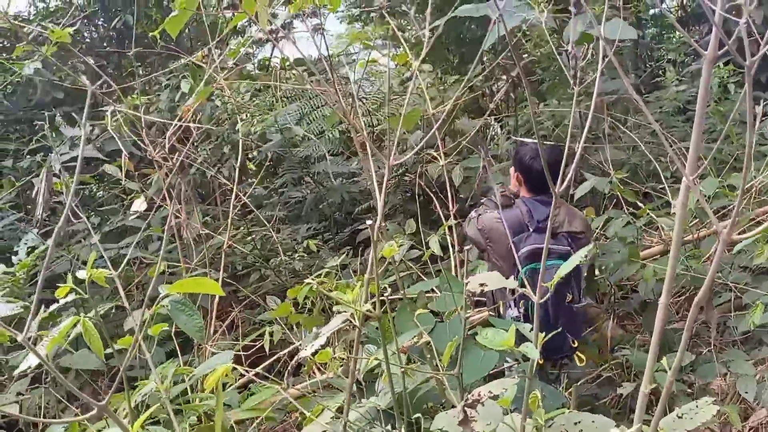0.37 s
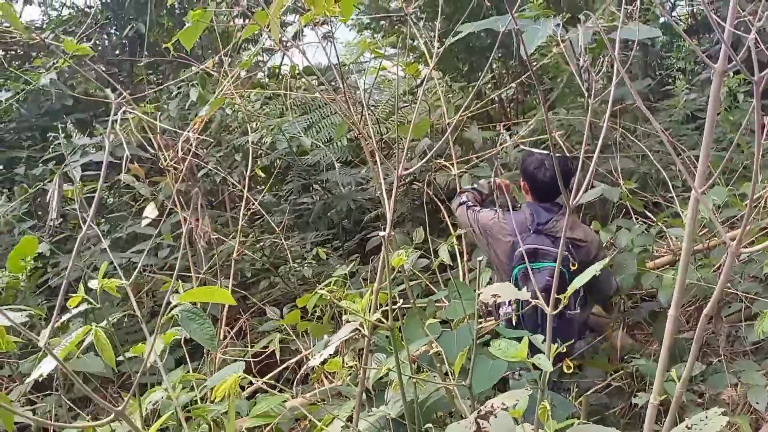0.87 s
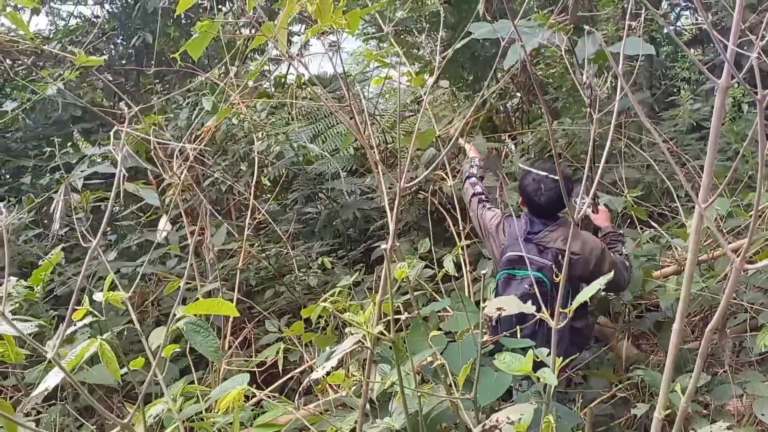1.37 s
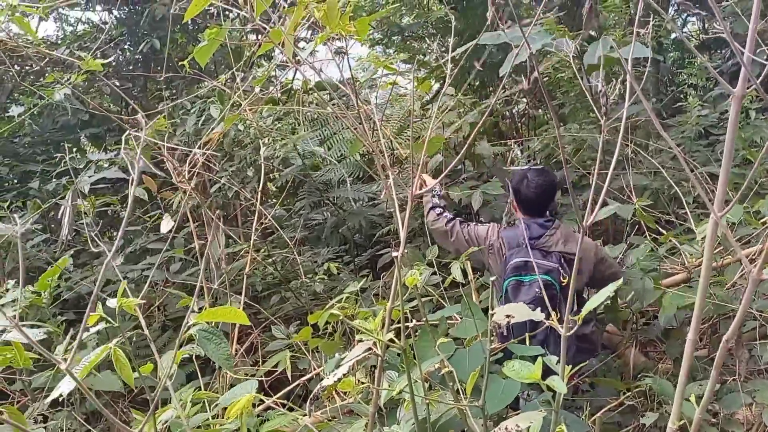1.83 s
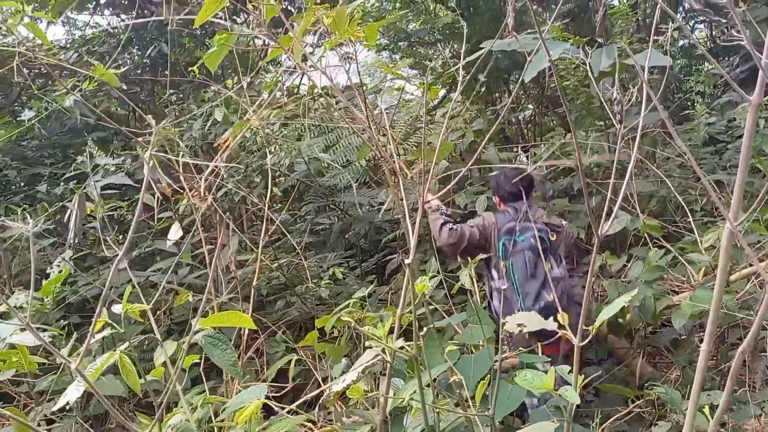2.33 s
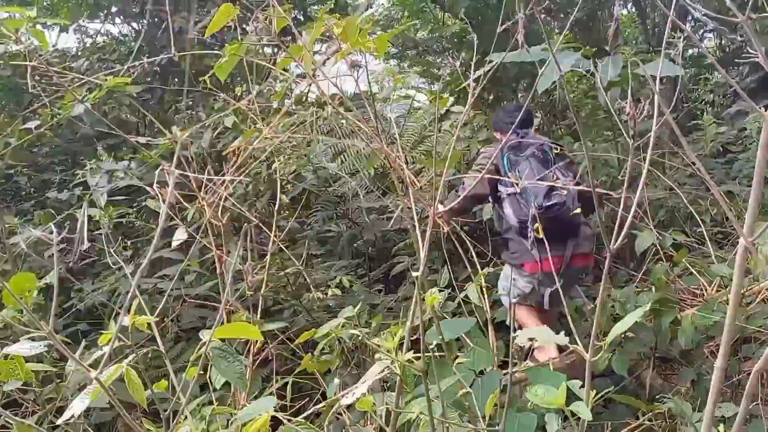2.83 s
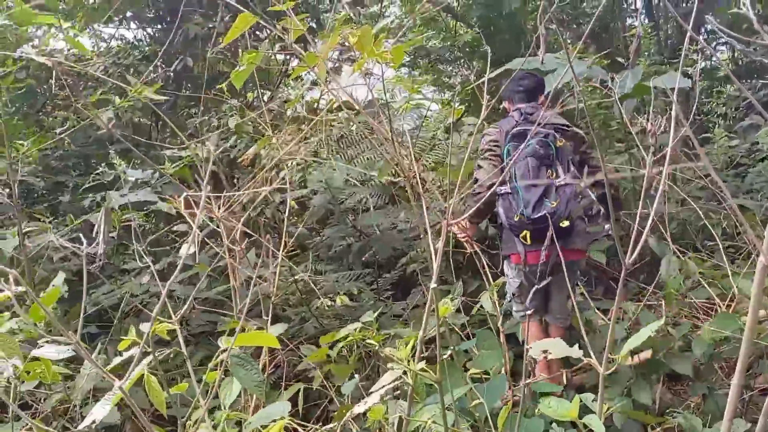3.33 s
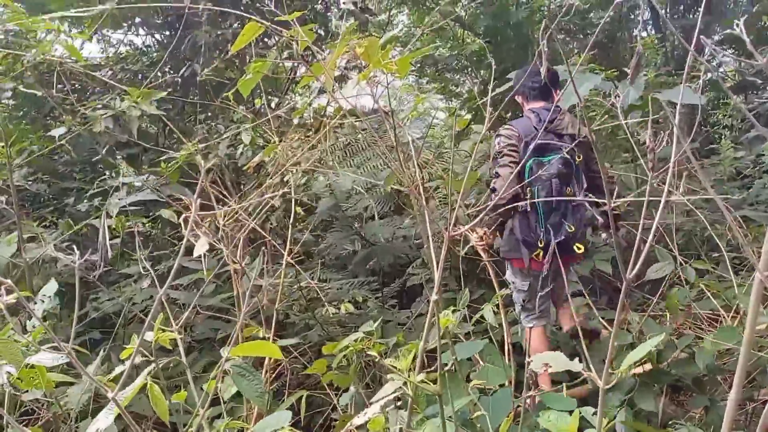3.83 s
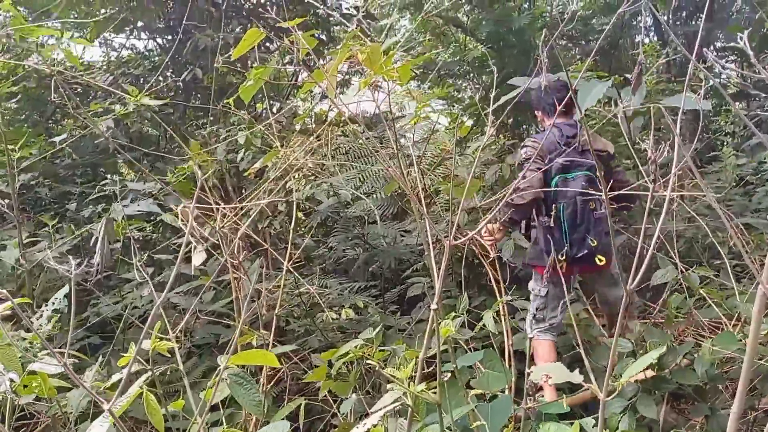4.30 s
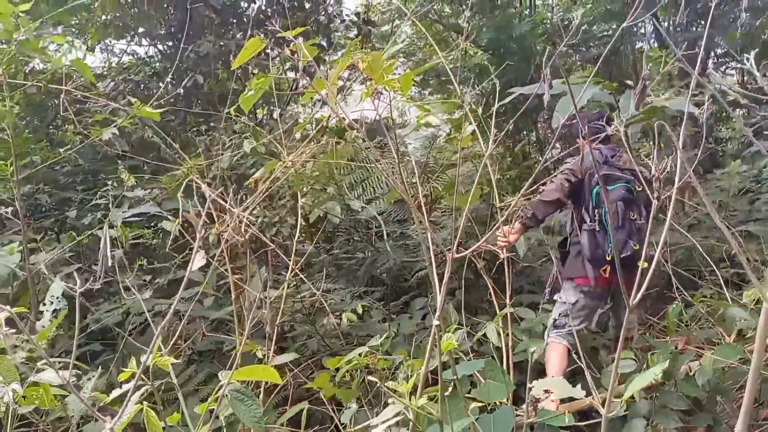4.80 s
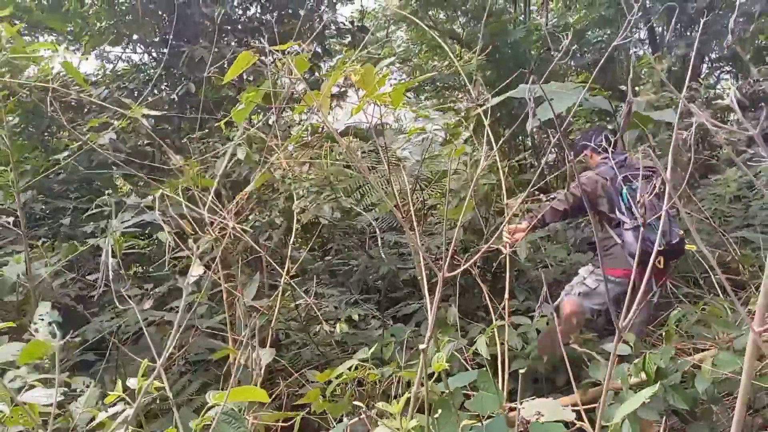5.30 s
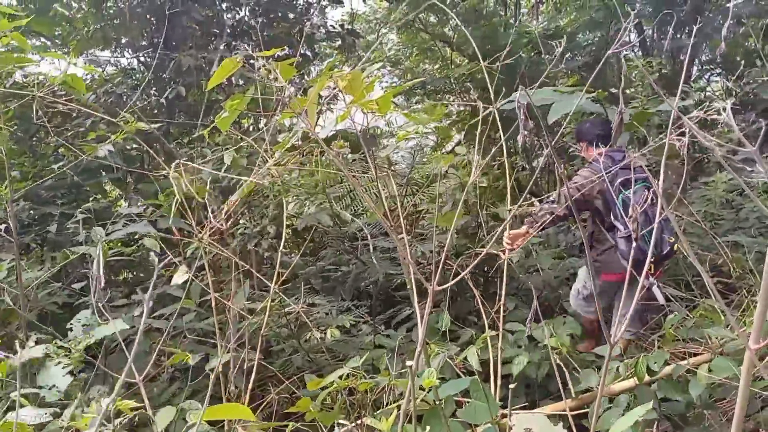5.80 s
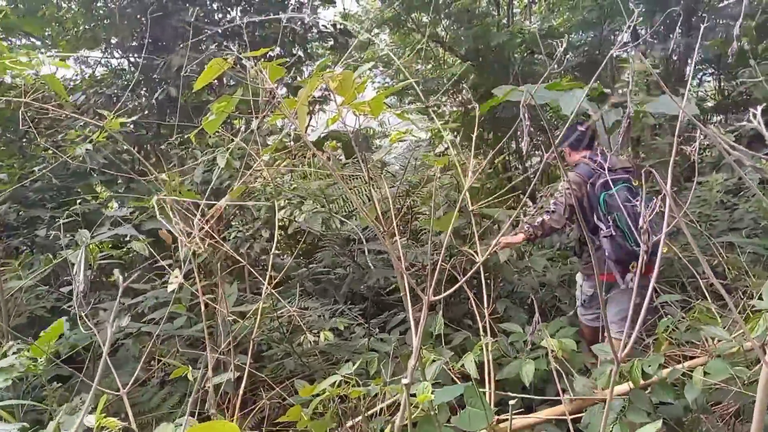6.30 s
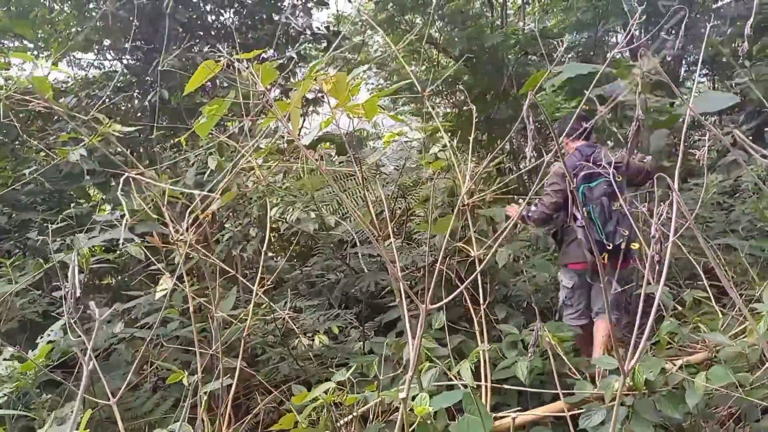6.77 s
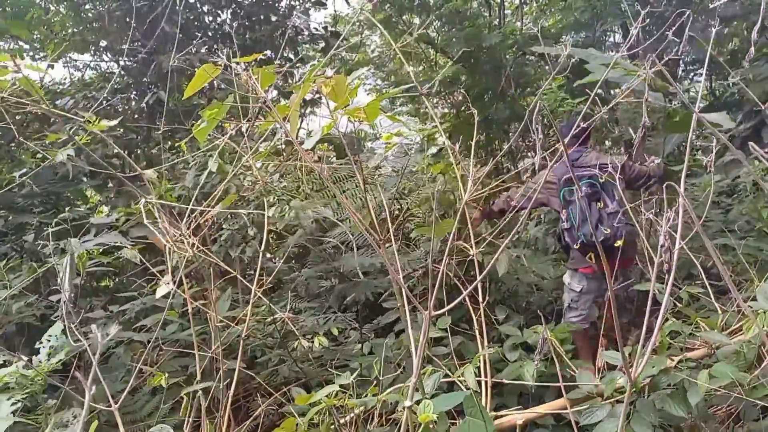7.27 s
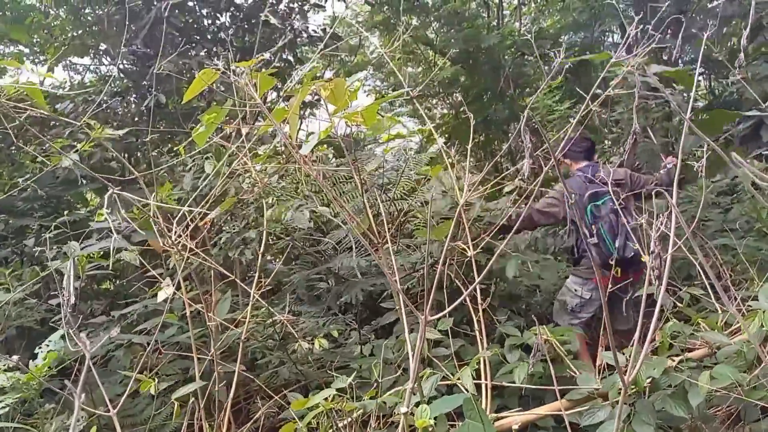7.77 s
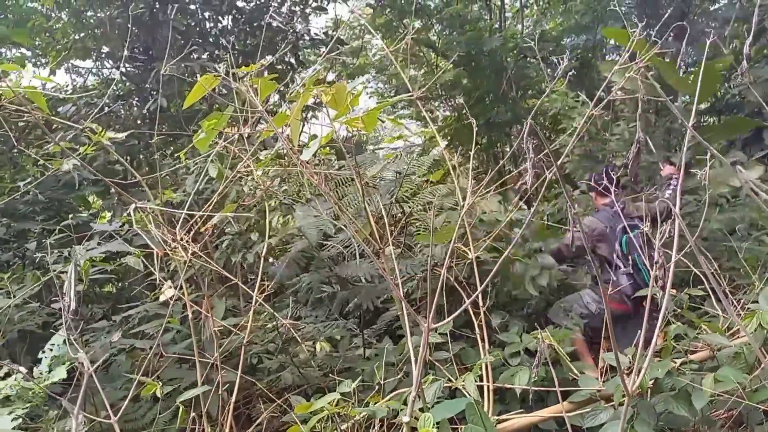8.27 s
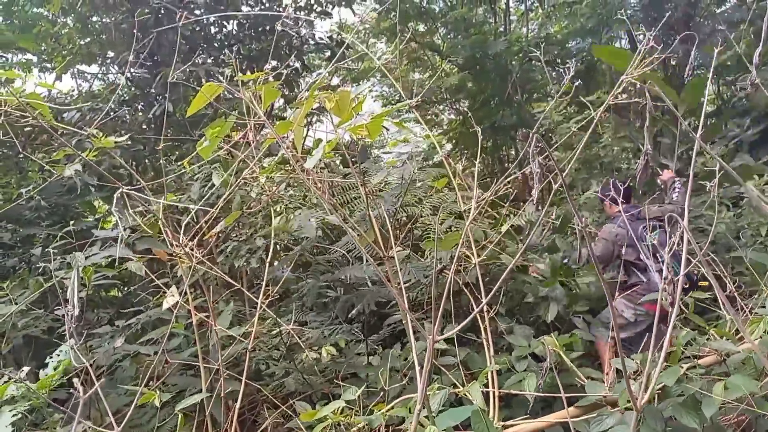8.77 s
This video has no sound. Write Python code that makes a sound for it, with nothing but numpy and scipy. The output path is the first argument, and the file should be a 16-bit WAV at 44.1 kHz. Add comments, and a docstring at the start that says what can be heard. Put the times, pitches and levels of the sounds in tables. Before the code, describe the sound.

Someone pushes through dry forest undergrowth, stems snapping, twigs ticking and wood knocking in irregular bursts over a faint high insect drone.

```python
"""Footsteps through dry undergrowth

A walker to the right pushes through brush: stems tear as fibre noise with ringing halves, dry tips tick,
struck wood rings in damped modes, and leaves and twigs crackle as random bursts of noise.
Trunks and foliage scatter these sounds, except the knocks, into a short diffuse tail. Behind them cicadas
drone as flickering noise bands, crickets trill as pulsed tones and faint air hushes, at two close ports."""
import sys
import numpy as np
from scipy import signal
from scipy.fft import rfft, irfft
from scipy.io import wavfile
from scipy.ndimage import uniform_filter1d

SR = 44100
rng = np.random.default_rng(int(sys.argv[2]) if len(sys.argv) > 2 else 0)


def persist_wave(psi):
    """Save psi, clipped to +-1, as 16-bit WAV."""
    counts = np.round(np.clip(psi, -1, 1) * 32767).astype(np.int16)
    wavfile.write(sys.argv[1], SR, np.atleast_2d(counts).T)


def attenuation_scalar(level_db):
    """Turn a level in dB into a linear amplitude multiplier (20 dB per decade)."""
    decades = np.asarray(level_db, float) / 20
    return 10 ** decades


N = 391608
TIME = np.arange(N) / SR

# stems tearing: t/s, woody level/dB, brittle level/dB, tearing time constant/ms
STEM_SNAPS = [(1.1804, -52.5, -27, 0.96), (2.8564, -34, -25, 3.3), (2.889, -26.5, -23, 4),
              (2.962, -40.5, -33.5, 3.7), (3.0194, -98, -36, 2.4), (3.147, -46, -38, 18),
              (3.2615, -28, -15, 2.03), (4.2911, -41, -29, 1.6), (4.4434, -31, -36, 3.6),
              (4.4515, -27.5, -25.5, 7.7), (4.527, -23.5, -37, 2.6), (4.597, -29.5, -37, 4.7),
              (5.161, -34.5, -24.5, 1.17), (5.197, -34, -58, 0.3), (5.4769, -40.5, -29.5, 4.9),
              (5.8229, -28.5, -23.5, 1.8), (5.923, -31, -19.5, 1.4), (6.2286, -34.5, -41, 1),
              (6.298, -42, -45, 2.2), (6.657, -49, -40, 1.7), (6.7356, -42.5, -26.5, 2.3),
              (6.7523, -42.5, -31.5, 5.2), (7.0324, -31.5, -25, 7.1), (7.0363, -31, -12, 3.45),
              (7.5274, -38.5, -25.5, 1.2), (7.6017, -36.5, -23.5, 0.77), (7.628, -40.5, -25, 2.8),
              (7.876, -31.5, -51, 1.6), (8.0253, -38, -28.5, 1.2), (8.0899, -25, -36, 3.1),
              (8.1255, -22, -28, 6.8), (8.158, -23.5, -28, 6.9), (8.304, -47, -30, 3.5),
              (8.458, -41.5, -43.5, 1.4), (8.836, -43, -35.5, 2.5)]
# single leaf stalks and twig tips breaking with one dry tick: t/s, level/dB, f/Hz
STALK_TICKS = [(0.401, -50, 2400), (0.8631, -28, 8700), (1.4522, -13.5, 13540), (1.5118, -18.5, 12600),
               (1.5598, -16, 13400), (1.573, -49, 2000), (1.599, -49, 1980), (2.421, -24, 3620),
               (2.464, -39, 1280), (2.536, -37, 1860), (2.761, -18, 4800), (3.518, -26, 11000),
               (3.594, -23, 13500), (3.714, -37, 2400), (3.8, -24.5, 12500), (4.798, -35, 1070),
               (4.831, -24, 12000), (5.07, -34, 1870), (5.175, -28, 1780), (5.252, -30, 9550),
               (5.258, -38, 913), (5.77, -15, 10400), (6.9213, -30, 1270), (7.283, -42, 1370),
               (7.8295, -26.5, 1480), (7.921, -21.5, 1470)]
# thick wood struck or cracked underfoot: t/s, level/dB, nominal ring f/Hz
WOOD_KNOCKS = [(1.385, -51.5, 550), (4.466, -8.5, 560), (4.503, -20.5, 518), (4.527, -18, 428),
               (4.595, -16.5, 453), (4.613, -20, 588), (5.903, -30, 394), (5.905, -24.5, 970),
               (5.924, -35, 490), (6.025, -40.5, 564), (6.758, -25.5, 273.7), (7.603, -25, 580),
               (7.88, -20, 533.5), (7.92, -18.5, 423), (8.014, -25.5, 460), (8.129, -16.5, 577),
               (8.164, -10.5, 563), (8.178, -21.5, 524), (8.203, -18.5, 422), (8.215, -23, 130),
               (8.223, -19, 497)]
# pushes through the brush: fully under way at t/s, held for t/s, dry leaves level/dB, twigs and tread level/dB
BRUSH_PUSHES = [(0.205, 0.016, -53, -70), (1.2, 0.026, -50, -57.5), (1.36, 0.025, -53.5, -65),
                (1.645, 0.0083, -56.5, -64), (2.338, 0.13, -47, -48.5), (2.62, 0.41, -52, -58.5),
                (2.892, 0.095, -60, -44.5), (3.38, 0.43, -55, -59), (4.101, 0.0067, -51, -62.5),
                (4.32, 0.045, -59, -55.5), (4.471, 0.1, -38, -37.5), (4.8, 0.17, -59, -56),
                (5.17, 0.065, -42.5, -46), (5.839, 0.16, -48, -46), (6.25, 0.16, -52, -54.5),
                (6.574, 0.35, -52.5, -53.5), (7.1, 0.73, -58.5, -55.5), (7.62, 0.64, -47.5, -47.5),
                (7.88, 0.06, -66, -39), (8.103, 0.16, -39.5, -35.5), (8.3, 0.12, -45, -46),
                (8.62, 0.42, -54, -55)]
# relative spectral density of the woody part of tearing: f/Hz, level/dB
WOODY_COLOUR = [(60, -46.5), (200, -16), (600, -5), (1300, -3), (3500, -4), (6000, -11), (16000, -53.5)]
# relative spectral density of brittle fibres and leaves: f/Hz, level/dB
BRITTLE_COLOUR = [(300, -56), (1500, -24), (4000, -5.5), (5700, -5.5), (6500, -10), (8900, -5.5),
                  (12000, -6), (16000, -2.5)]
# relative spectral density of twigs and tread: f/Hz, level/dB
TWIG_COLOUR = [(60, -12), (130, -13), (200, -8.5), (550, -2.5), (800, -7.5), (2000, -6.5), (3500, -7.5),
               (8000, -13)]
# forest scatter, near brush then far trunks: reverberation time t60/s, returned level/dB
FOREST_SCATTER = [(0.079, -3.5), (0.501, -8)]
# drone bands of the cicada chorus: f/Hz, width of each of two passes/Hz, relative level/dB
CICADA_BANDS = [(5160, 870, 3.5), (5920, 710, 4)]
# slow swell of the chorus: t/s, level/dB
CHORUS_SWELL = [(0.0, -57), (8.88, -53)]
# cricket trills: start t/s, end t/s, f/Hz, level/dB
CRICKET_TRILLS = [(0, .35, 6930, -65), (.33, 4.45, 7290, -66), (1.72, 2.5, 6850, -67),
                  (5.5, 7.0, 7310, -67)]
# relative spectral density of the still air: f/Hz, level/dB
AIR_COLOUR = [(30, -16.5), (86, -4.5), (190, -11), (577, -4), (790, -12), (1940, -12.5), (3480, -15.5),
              (8800, -11), (16000, -11)]


def points(table, hz):
    """Logarithmic frequency scale: levels are interpolated along it."""
    table_hz, db = np.transpose(table)
    return np.interp(np.log(hz + 1), np.log(table_hz), db)


def unit(x):
    """Normalisation to a root-mean-square value of 1."""
    return x / np.sqrt(np.mean(x ** 2))


def colour(x, table):
    """Minimum-phase filtering: a folded cepstrum gives a causal response, here with power gain 1."""
    db = points(table, np.linspace(0, SR / 2, 1025))
    cepstrum = irfft(np.log(attenuation_scalar(db)))
    # fold the anticausal half onto the causal half
    cepstrum[1:1024] *= 2
    cepstrum[1025:] = 0
    taps = irfft(np.exp(rfft(cepstrum)))
    taps = taps / np.linalg.norm(taps)
    return signal.fftconvolve(x, taps[None], axes=-1)[..., :N]


def band(x, hz, width_hz):
    """Simple resonance: one second-order peak with gain 1 at its centre."""
    return signal.lfilter(*signal.iirpeak(hz, hz / width_hz, SR), x)


def high_pass(x, order, hz):
    """High-pass filtering: a Butterworth response removes the bass."""
    return signal.lfilter(*signal.butter(order, hz, "high", fs=SR), x)


def walk(rate):
    """Smoothed random modulation: held random levels are averaged twice, with a spread near 1."""
    hold = int(SR / rate)
    levels = np.repeat(rng.standard_normal(N // hold + 1), hold)
    return 1.46 * uniform_filter1d(uniform_filter1d(levels, hold), hold)[:N]


def crackle(db, per_s, spread_db, ms):
    """Impulsive noise: random bursts decay exponentially, most of them faint and a few strong."""
    strength = np.minimum(rng.exponential(size=N), 3.5)
    bursts = (rng.random(N) < per_s / SR) * attenuation_scalar(spread_db * strength)
    fade = np.exp(-1000 / (ms * SR))
    envelope = signal.lfilter([1], [1, -fade], bursts)
    return attenuation_scalar(db) * unit(envelope * rng.standard_normal(N))


def snaps():
    """Fracture of fibrous stems: fibres part in a sudden crack, then a ragged tearing, and the halves ring."""
    t = np.arange(3000) / SR
    total = N + len(t)
    woody, brittle = np.zeros(total), np.zeros(total)
    fibres = rng.standard_normal((2, total))
    # fibres give way in fits
    fibres *= attenuation_scalar(3.5 * np.resize(walk(700), total))
    chance = rng.random((len(STEM_SNAPS), 2))
    for (s, woody_db, brittle_db, ms), half_pitch in zip(STEM_SNAPS, chance):
        start = int(s * SR)
        span = slice(start, start + len(t))
        u = t * 1000 / max(ms, 0.15)
        # a quick break puts more into its first crack
        crack = (1 + 2 * np.exp(-ms)) * u ** 0.8 * np.exp(1 - u)
        tearing = 0.16 * (1 - np.exp(-u)) * np.exp(-u / 8)
        shape = crack + tearing
        tear = shape * fibres[0, span]
        # each broken half has a pitch of its own
        ring = sum(band(tear, hz, hz / 7) for hz in 800 * 4.3 ** half_pitch)
        woody[span] += attenuation_scalar(woody_db) * (tear + 0.47 * ring)
        # a thin stem parts quickly and sounds sharper
        sharp = signal.lfilter([1, -np.exp(-ms / 2.2)], [1], shape * fibres[1, span])
        brittle[span] += attenuation_scalar(brittle_db) * sharp
    return woody[:N], brittle[:N]


def knocks():
    """Modal excitation: a push about a cycle long rings a main mode and two weaker ones, well below and
    above it; soil damps them within a few cycles."""
    # frequency ratio, level/dB
    modes = [(1.0162, -5.5), (0.707, -15.5), (1.5, -15.5)]
    out = np.zeros(N)
    t = np.arange(4000) / SR
    chance = rng.random((len(WOOD_KNOCKS), len(modes)))
    for (s, db, hz), phases in zip(WOOD_KNOCKS, chance):
        u = t * hz / 1.3
        push = (u * np.exp(1 - u)) ** 2
        decay = 0.97 * (1 - np.exp(-u)) * np.exp(-u / 4)
        ring = 0
        for (ratio, mode_db), phase in zip(modes, phases):
            ring = ring + attenuation_scalar(mode_db) * np.sin(2 * np.pi * (ratio * hz * t + phase))
        start = int(s * SR)
        out[start:start + len(t)] += attenuation_scalar(db) * (push + decay) * ring
    return out


def ticks():
    """Damped broad resonance: a few cycles of crackle sound, and the forest returns them in the same colour."""
    q, decay_cycles = 1.07, 2.7
    tail = np.sqrt(echoes())
    t = np.arange(len(tail)) / SR
    out = np.zeros((2, N + len(t)))
    noises = rng.standard_normal((len(STALK_TICKS), 3, len(t)))
    for (s, db, hz), noise in zip(STALK_TICKS, noises):
        noise = band(band(noise, hz, hz / q), hz, hz / q)
        tone = 2 * np.sin(2 * np.pi * hz * t)
        tick = np.exp(-t * hz / decay_cycles) * (unit(noise[0]) + tone) / 2
        # each tick keeps nothing below half its pitch
        tick = high_pass(tick, 2, hz / 2)
        scatter = attenuation_scalar(0.5) * np.linalg.norm(tick) * tail * unit(noise[1:])
        start = int(s * SR)
        out[:, start:start + len(t)] += attenuation_scalar(db) * (ports(tick) + scatter)
    return out[:, :N]


def push_powers():
    """Power addition of incoherent sources: each push swells, holds and dies away as the brush settles."""
    rise_db_per_s, fall_db_per_s = 164, 132
    leaves, twigs = 1e-12, 1e-12
    for s, held, leaves_db, twigs_db in BRUSH_PUSHES:
        rise = rise_db_per_s * (TIME - s)
        fall = fall_db_per_s * (s + held - TIME)
        shape_db = np.minimum(0, np.minimum(rise, fall))
        leaves = leaves + attenuation_scalar(2 * (leaves_db + shape_db))
        twigs = twigs + attenuation_scalar(2 * (twigs_db + shape_db))
    return leaves, twigs


def rustle():
    """Granular crackling noise: leaves crinkle, twigs crunch and soil yields as bursts under each push."""
    leaves, twigs = push_powers()
    leaves_db, twigs_db = 10 * np.log10(leaves), 10 * np.log10(twigs)
    tread = crackle(twigs_db - 3, per_s=300, spread_db=3, ms=4)
    # soil and buried sticks give way in dull, broken lumps, far more under a full step than a light one
    lumps = crackle(1.772 * twigs_db + 44, per_s=64, spread_db=1, ms=22)
    soil = high_pass(band(lumps, 106.5, 95), 2, 70)
    # small twigs break one by one, each thickness with a brief ring of its own
    rings = 0
    for hz in 520 * 1.38 ** np.arange(7):
        breaks = crackle(twigs_db + 3, per_s=130, spread_db=3.5, ms=1.5)
        rings = rings + band(breaks, hz, hz / 4.5) * (hz / 1000) ** -0.3
    # large leaves crinkle low and small ones high, each size at its own moments
    crinkle = 0
    for hz in (3000, 6500, 13000):
        folds = crackle(leaves_db + 2, per_s=400, spread_db=4, ms=1.3)
        crinkle = crinkle + band(folds, hz, hz)
    return crinkle, tread + rings + soil


def ports(x):
    """Interaural-type delay and shading: from the right, the left port is later and duller."""
    lag = 5  # samples
    treble = signal.filtfilt(*signal.butter(2, 6000, "high", fs=SR), x)
    # the shaded treble creeps round the body's edge
    left = np.roll(x - treble, lag) + 0.45 * np.roll(treble, lag - 1)
    return np.array([left, x])


def diffuse(x, apart_hz):
    """Diffuse-field coherence: two close ports agree in the bass and are unrelated in the treble."""
    mid = x[0]
    side = high_pass(x[1], 1, apart_hz)
    return np.array([mid + side, mid - side]) / np.sqrt(2)


def echoes():
    """Exponential reverberant decay: the share of energy that the forest returns, sample by sample."""
    t = np.arange(SR // 2) / SR
    energy = 0
    for t60, db in FOREST_SCATTER:
        fade = np.exp(-2 * np.log(1000) * t / t60) * (1 - np.exp(-t / 0.00042))
        energy = energy + attenuation_scalar(2 * db) * fade / fade.sum()
    return energy


def forest(source, table):
    """Multiple scattering: countless moving leaves return the energy as fresh noise from all round."""
    returned = signal.fftconvolve(source ** 2, echoes())[:N]
    spread = np.sqrt(np.abs(returned)) * attenuation_scalar(1.2 * walk(80))
    wet = diffuse(spread * rng.standard_normal((2, N)), 400)
    # thin stems scatter little bass
    wet = high_pass(wet, 1, 350)
    return colour(ports(source) + wet, table)


def cicadas():
    """Superposition of many callers: a distant chorus merges into broad noise bands that flicker a little."""
    drone = 0
    for hz, width_hz, db in CICADA_BANDS:
        flicker_db = 0.57 * walk(25)
        noise = rng.standard_normal((2, N))
        voices = band(band(noise, hz, width_hz), hz, width_hz)
        drone = drone + attenuation_scalar(db + flicker_db) * voices
    swell_db = np.interp(TIME, *np.transpose(CHORUS_SWELL))
    return attenuation_scalar(swell_db) * unit(drone)


def crickets():
    """Amplitude modulation by stridulation: steady wing strokes gate a tone of wandering phase and level."""
    strokes_per_s = 51
    out = 0
    for start, end, hz, db in CRICKET_TRILLS:
        gate = np.clip(np.minimum(TIME - start, end - TIME) / 0.021, 0, 1)
        strokes = np.clip(np.sin(2 * np.pi * strokes_per_s * TIME) + 0.77, 0, 1)
        # the second port hears a fixed phase shift
        phase = 1.2 * walk(90) + np.array([[0], [1.7]])
        tone = np.sin(2 * np.pi * hz * TIME + phase)
        out = out + attenuation_scalar(db + walk(29)) * gate * unit(strokes * tone)
    return out


def air():
    """Diffuse ambient noise: faint far-off leaves and wind waver slightly in level."""
    hush = colour(diffuse(rng.standard_normal((2, N)), 220), AIR_COLOUR)
    return attenuation_scalar(-56.5 + 0.28 * walk(4.4)) * hush


def scene():
    """Linear superposition: the walker in the scattering forest adds to the insects and the air."""
    woody, brittle = snaps()
    leaves, twigs = rustle()
    walker = forest(woody, WOODY_COLOUR)
    walker = walker + forest(brittle + leaves, BRITTLE_COLOUR)
    walker = walker + forest(twigs, TWIG_COLOUR)
    walker = walker + ports(knocks()) + ticks()
    return walker + cicadas() + crickets() + air()


def roll_off(x):
    """The treble ends steeply here."""
    return signal.sosfilt(signal.butter(12, 17130, fs=SR, output="sos"), x)


def record(dry):
    """Band-limited reception: the microphone drops the deep bass and top treble, and its cavity resonates."""
    x = signal.sosfilt(signal.butter(2, 75, "high", fs=SR, output="sos"), dry)
    # a small cavity behind the ports
    x = x + 0.65 * band(x, 1968, 98)
    x = signal.sosfilt(signal.ellip(8, 0.3, 40, 15800, fs=SR, output="sos"), x)
    return roll_off(x)


dry = scene()
out = record(dry)
persist_wave(out)
```